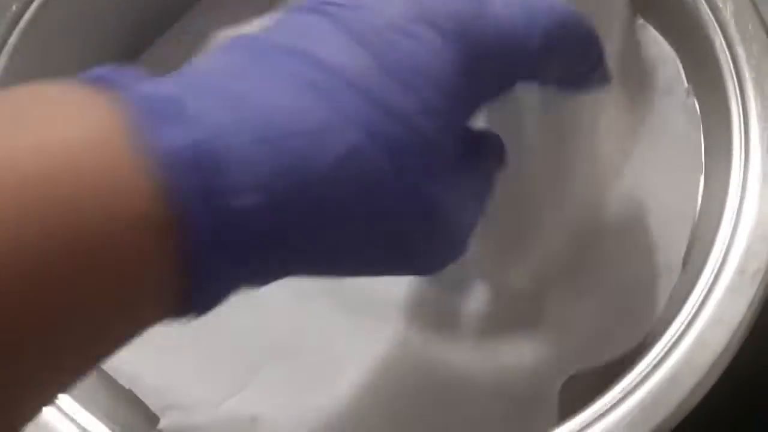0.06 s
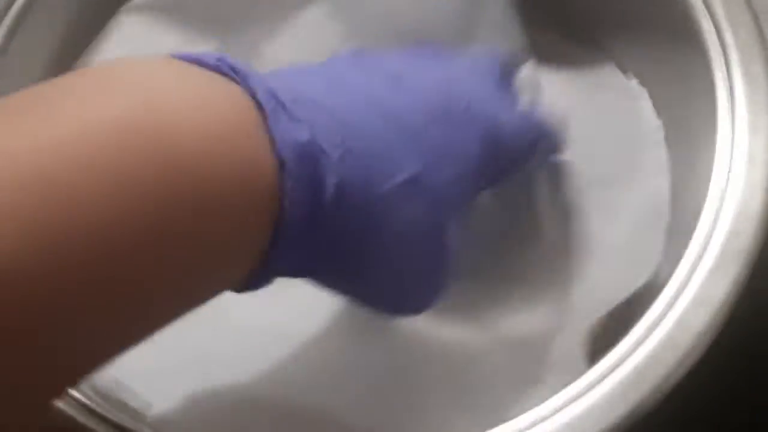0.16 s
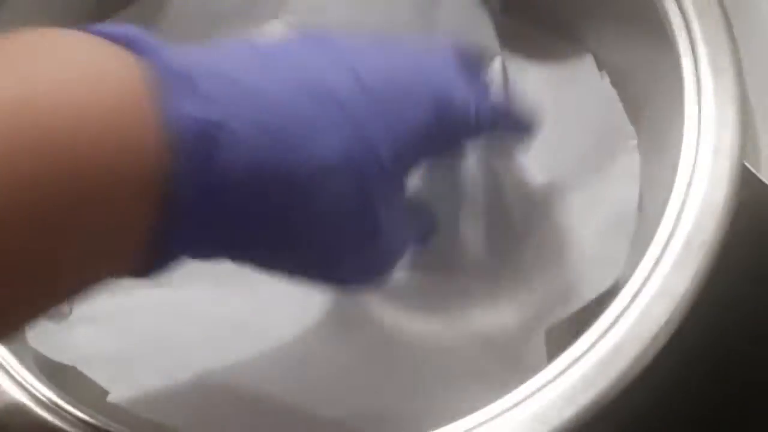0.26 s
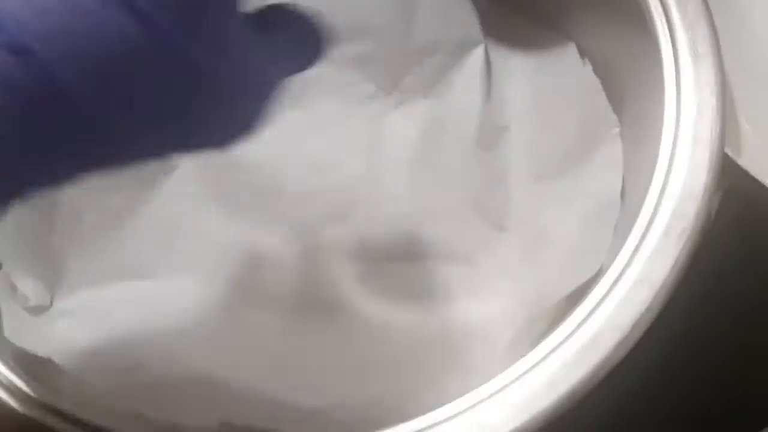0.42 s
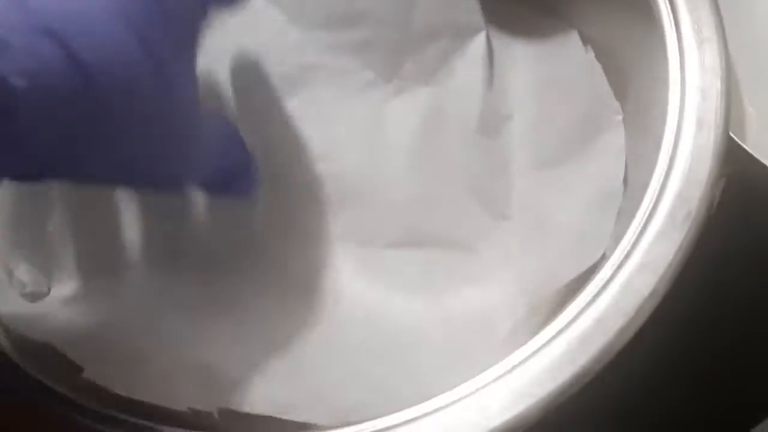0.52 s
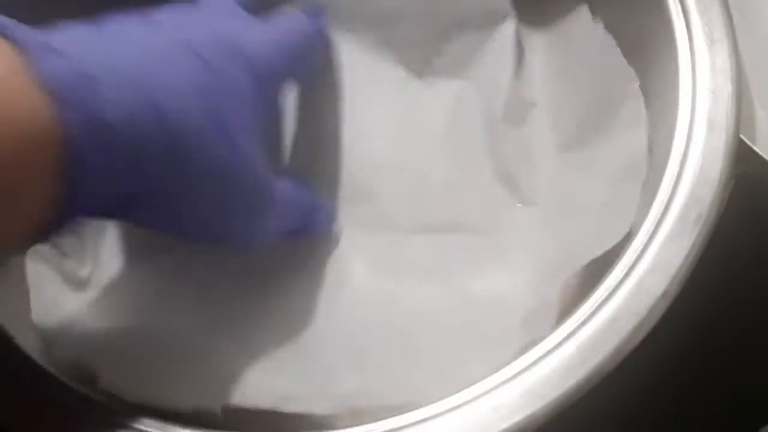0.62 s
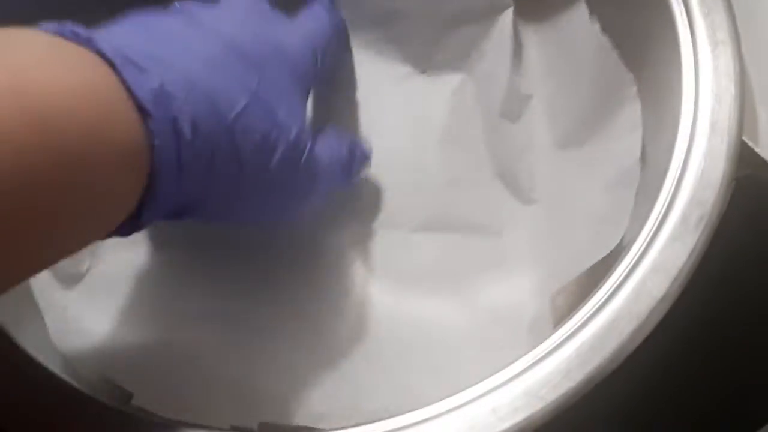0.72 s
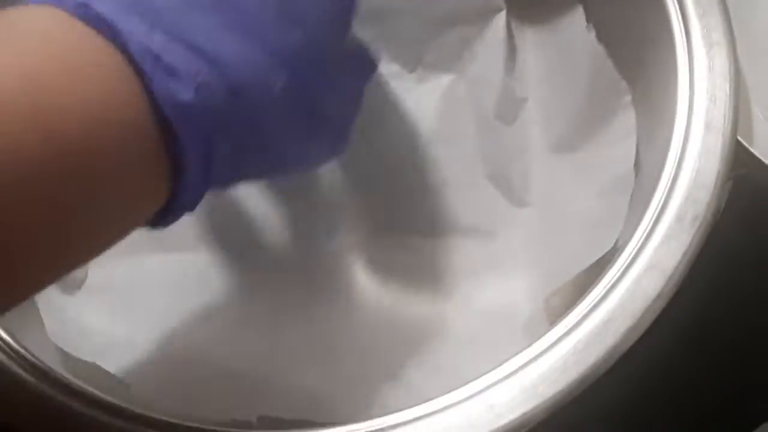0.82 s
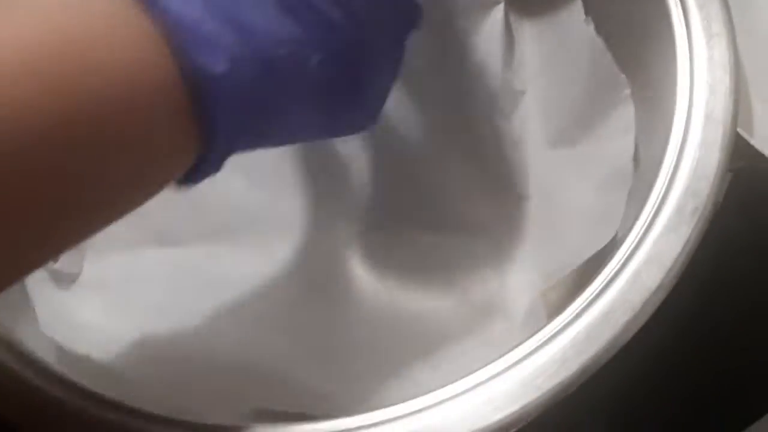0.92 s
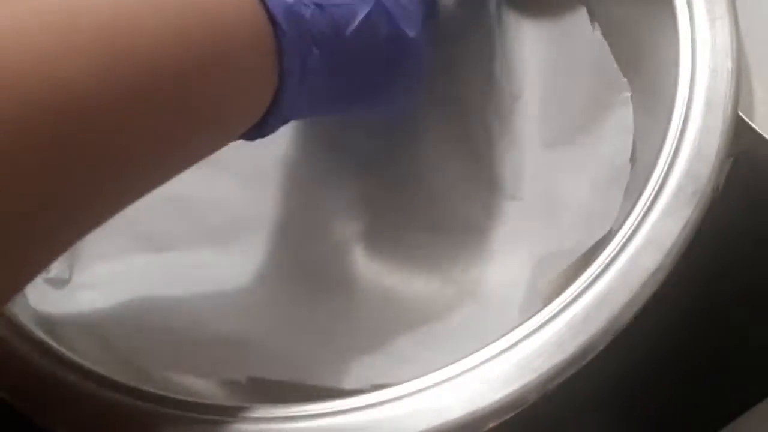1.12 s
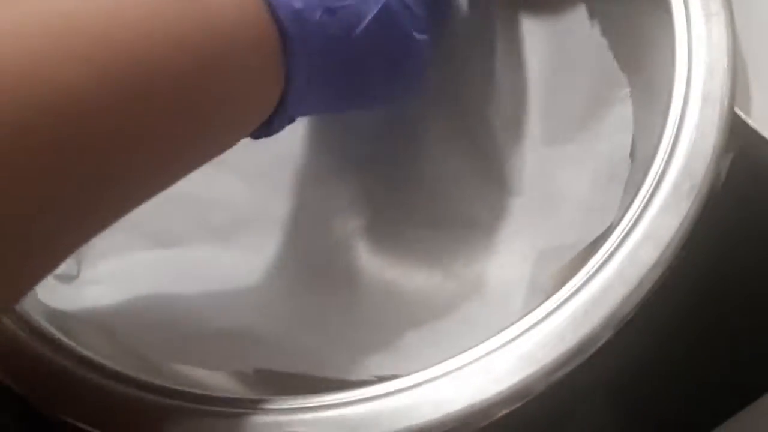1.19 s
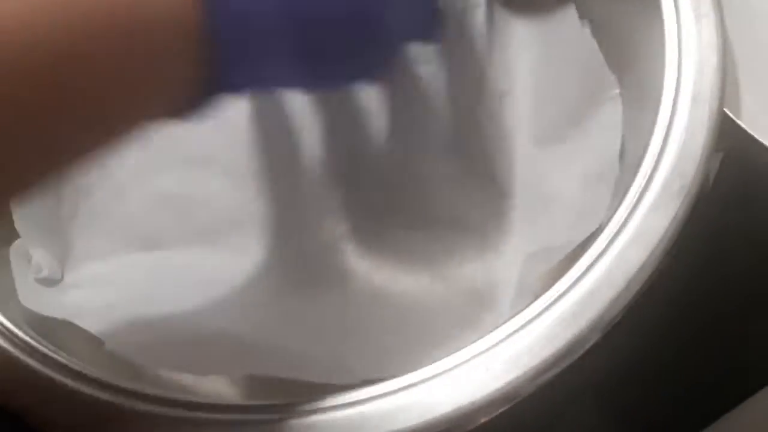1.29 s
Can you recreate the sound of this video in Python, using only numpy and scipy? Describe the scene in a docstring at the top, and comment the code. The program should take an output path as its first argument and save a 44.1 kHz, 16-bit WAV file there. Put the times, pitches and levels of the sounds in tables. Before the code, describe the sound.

Stiff baking paper crackles in three quick bursts as it is pressed into a metal pot

```python
"""A gloved hand presses baking paper into a metal pot three times, close to a pair of microphones.
The paper crackles as clumped random wavelets; creases snap as noise bursts through a resonant patch,
and the sheet pops as short damped tones. Soft knocks and a low thump come from the pushed pot.
The pot wall rings on its modes, sparse echoes fill pot and kitchen, and shaped noise is the room tone."""
import sys
import numpy as np
from scipy import signal
from scipy.fft import rfft, irfft
from scipy.io import wavfile
from scipy.ndimage import uniform_filter1d

SR = 44100
rng = np.random.default_rng(int(sys.argv[2]) if len(sys.argv) > 2 else 0)


def voltage_ratio(decibels):
    """Convert decibels (scalar or array-like) to amplitude ratios, 20 dB per decade."""
    exponent = np.asarray(decibels, float) / 20
    return 10 ** exponent


def generate_wav(signal):
    """Clip the signal to [-1, 1] and save it as 16-bit WAV at the path in sys.argv[1]."""
    frames = np.transpose(np.atleast_2d(signal))
    scaled = np.clip(frames, -1, 1) * 32767
    pcm = np.round(scaled).astype(np.int16)
    wavfile.write(sys.argv[1], SR, pcm)


N = 59535  # length [samples]

# Strength and colour of the paper's rustle, one list of rows for each press of the hand:
# (time [s], relative level [dB], treble gain [dB], thump relative to level [dB], body gain [dB])
PRESSES = [
    [(0.045, -108, 2, -30, -3), (0.051, -53, -22, -37, -2), (0.058, -37.5, -2.5, -39, 5),
     (0.127, -23, 8.5, -24, 7), (0.135, -23.5, 2, -28, 0), (0.175, -13.5, 6, -36, 0.5),
     (0.225, -29.5, 3.5, -21.5, 3), (0.233, -22, 1, -26.5, 8.5), (0.273, -49, -5.5, -10.5, 5),
     (0.535, -78, 6, -25, 3)],
    [(0.54, -87.5, 1.5, -29, -1), (0.546, -29, 1.5, -21, 5.5), (0.596, -32, 9, -40, -1),
     (0.604, -17.5, 5, -29, 1), (0.69, -26.5, 9.5, -24, -4.5), (0.714, -34, 1, -31, 1),
     (0.72, -29, 6, -34, -7.5), (0.822, -45, 1, -32, 8.5), (0.834, -38, -4, -18, -10),
     (0.852, -42, 3, -21.5, 5.5), (0.93, -57, -3, -25, 11.5)],
    [(0.935, -69, -6, -26.5, 6), (0.941, -39.5, -2, -30, 12), (0.991, -17.5, 7.5, -39.5, -1),
     (1.011, -24.5, 4, -30, -2), (1.037, -21.5, 11, -27, 2), (1.077, -38.5, 12, -13.5, -9.5),
     (1.111, -33.5, 8.5, -28, -3), (1.35, -75.5, -11, -28, 8.5)],
]
MAX_LAG_S = 0.00026  # largest delay between the two microphones
TREBLE_HZ = 5300


def evened(x):
    """Normalization: scales to unit rms."""
    return x / np.sqrt(np.mean(x ** 2) + 1e-20)


def read(points, hz):
    """Interpolation: reads a table on a log-frequency axis."""
    f, value = np.transpose(points)
    return np.interp(np.log(hz + 1), np.log(f + 1), value)


def colour(x, points):
    """Linear filtering: weights the spectrum by gains in dB."""
    gain = voltage_ratio(read(points, np.fft.rfftfreq(N, 1 / SR)))
    return irfft(rfft(x) * gain, N)


def high_pass(x, hz):
    """Second-order high-pass: attenuates what lies below its corner."""
    return signal.sosfilt(signal.butter(2, hz, "high", fs=SR, output="sos"), x)


def resonate(x, hz, width):
    """Resonance: a band of the given width [Hz] with gain 1 at its centre."""
    return signal.lfilter(*signal.iirpeak(hz, hz / width, SR), x)


def pan(db):
    """Level difference between channels: half of it up on the left, half down on the right."""
    return voltage_ratio(np.array([[.5], [-.5]]) * db)


def add(mix, s, sound):
    """Superposition: mixes a sound into both channels at a time."""
    part = mix[:, round(s * SR):][:, :sound.shape[1]]
    part += sound[:, :part.shape[1]]


def floor():
    """Partly coherent noise: quiet room tone whose left-right likeness depends on frequency."""
    # Spectrum of the room tone: (frequency [Hz], relative gain [dB])
    spectrum = [(15, -37.5), (25, 12.5), (134, -5), (217, -19), (427, -9.5), (1160, -28), (3720, -30.5),
                (4030, -39.5), (4370, -28), (16000, -39)]
    # Likeness of the two channels: (frequency [Hz], correlation [0 to 1])
    likeness = [(60, 0.88), (180, 0.13), (550, 0.54), (1650, 0), (4970, 0.57), (15000, 0.37)]
    level_db = -54.5
    a, b = rfft(rng.standard_normal((2, N)))
    same = np.clip(read(likeness, np.fft.rfftfreq(N, 1 / SR)), -1, 1)
    right = same * a + np.sqrt(1 - same ** 2) * b
    return voltage_ratio(level_db) * evened(colour(irfft([a, right], N), spectrum))


def press(column):
    """Slowly varying excitation: one control of the presses, interpolated over the whole scene."""
    rows = np.concatenate(PRESSES)
    return np.interp(np.arange(N) / SR, rows[:, 0], rows[:, column])


def pressing():
    """Onset gate: 1 from the first touch of the paper on."""
    return np.arange(N) / SR > PRESSES[0][0][0]


def crackle():
    """Random impulse train: thousands of tiny clumped buckles, each a wavelet from its own spot."""
    # Spectral weighting of the paper: (frequency [Hz], relative gain [dB])
    weighting = [(150, -50), (250, -12.5), (370, -5.5), (500, -2.5), (2160, 7.5), (2960, 9.5), (4120, 9),
                 (8260, 0.5), (14900, 2), (16000, -27)]
    rustle_db, body_hz = -5, 1300
    grains_per_s, grain_spread_db, grain_cycles = 20000, 2.4, 1.41
    clump_db, clump_s = 2, 0.0042
    clumps = evened(uniform_filter1d(rng.standard_normal(N), max(int(clump_s * SR), 2)))
    size = voltage_ratio(grain_spread_db * np.minimum(rng.exponential(1, N), 5) + clump_db * clumps)
    size *= (rng.random(N) < grains_per_s / SR) * rng.choice([-1., 1.], N)
    kind = rng.integers(0, 48, N)  # which of 48 pitches each grain has
    lag = np.round(rng.uniform(-1, 1, N) * MAX_LAG_S * SR).astype(int)
    later = np.clip(np.arange(N) + lag, 0, N - 1)  # arrival at the right microphone
    out = np.zeros((2, N))
    for k, hz in enumerate(np.geomspace(500, 16000, num=48)):
        u = np.arange(200) * hz / SR  # time in cycles
        grain = u * np.exp(-u * 2 / grain_cycles) * np.sin(2 * np.pi * u)
        grain *= np.sqrt(hz) / np.linalg.norm(grain)
        left = size * (kind == k)
        train = np.array([left, np.bincount(later, left, N)])
        out += signal.oaconvolve(train, grain[None], axes=1)[:, :N]
    out = evened(colour(out, weighting))
    treble = high_pass(out, TREBLE_HZ)
    body = signal.sosfilt(signal.butter(2, body_hz, fs=SR, output="sos"), out)
    shaded = out + (voltage_ratio(press(4)) - 1) * body + (voltage_ratio(press(2)) - 1) * treble
    return pressing() * voltage_ratio(press(1) + rustle_db) * shaded


def thump():
    """Narrow-band noise: the hand pushes the pot and its air, a low rumble that follows the press."""
    centre_hz, width_hz = 155, 140
    low = rng.standard_normal((2, N))
    for _ in range(2):
        low = resonate(low, centre_hz, width_hz)
    shared = low + low[::-1] * .4  # each channel hears some of the other
    return pressing() * voltage_ratio(press(1) + press(3)) * evened(shared)


def pot(x):
    """Modal superposition: the metal wall rings faintly as a sum of decaying sines."""
    # Modes of the pot wall: (frequency [Hz], relative level [dB], t60 [s])
    modes = [(420, -2, .4), (657, -7, .5), (996, -8, .6), (1308, -6, .6), (1507, -3, .7), (1728, -7, .7),
             (1873, -10, .6), (2148, -8, .5), (2342, -14, .6), (2740, 0, .3), (3210, -12, .5),
             (4161, -14, .4)]
    t = np.arange(N) / SR
    ring = sum(voltage_ratio(db - 60 * t / t60) * np.sin(2 * np.pi * hz * t) for hz, db, t60 in modes)
    return signal.fftconvolve(x, ring[None] / len(modes), axes=1)[:, :N]


def echoes(x, t60s, first):
    """Exponential reverberant decay: sparse random echoes per channel, each band with its own t60."""
    taps = np.zeros((2, SR))
    at = np.arange(first, SR - 40, 12)  # one echo in every 12 samples
    at = at + rng.integers(0, 12, (2, len(at)))
    np.put_along_axis(taps, at, rng.choice([-1., 1.], at.shape), 1)
    hz, t, z = signal.stft(taps, SR, nperseg=128)
    decay = voltage_ratio(-60 * t / read(t60s, hz)[:, None])
    h = signal.istft(z * decay, SR, nperseg=128)[1]
    h[:, :first] = 0  # silence before the first echo [samples]
    h /= np.linalg.norm(h, axis=1, keepdims=True)
    return signal.fftconvolve(x[None], h, axes=1)[:, :N]


def tail(x, t60s, first):
    """Varying echo paths: three spots take turns, so that like sounds do not share one colour."""
    turn = np.arange(N) / SR * 2 * np.pi * 9  # nine turns a second
    mono = x.mean(0) * np.sqrt(2 / 3)  # keeps the summed power of the three weights at 1
    return sum(echoes(mono * np.cos(turn + k * np.pi / 3), t60s, first) for k in range(3))


def snap(s, db, hz, treble_db, pan_db):
    """Impulsive excitation of a resonator: a flipping crease drives the patch of paper beside it."""
    rise_s, rattle_s = 0.00088, 0.0047  # burst peak time; decay of the rattle between the pot walls
    level_db, rattle_db = -8, -2
    patch_q, patch_width_hz, click_share = 2.6, 500, .45
    t = np.arange(2000) / SR
    draw = rng.standard_normal((3, len(t)))
    lag = round(np.clip(draw[0, 0], -1, 1) * MAX_LAG_S * SR)
    burst = np.roll(draw[0] * (t / rise_s) * np.exp(1 - t / rise_s), 14)
    burst = np.array([burst, np.roll(burst, lag)])
    burst += voltage_ratio(rattle_db) * draw[1:] * np.minimum(t / rise_s / 2, 1) * np.exp(-t / rattle_s)
    click = np.zeros_like(burst)
    click[0, 30], click[1, 30 + lag] = 1, 1
    drive = click_share * evened(click) + (1 - click_share) * evened(burst)
    patch = resonate(drive, hz, patch_width_hz + hz / patch_q)
    patch = resonate(patch, hz, 2 * hz / patch_q + patch_width_hz)
    hiss = high_pass(burst, TREBLE_HZ / 2)
    wave = evened(patch) + voltage_ratio(treble_db) * evened(hiss)
    wave[1] *= np.linalg.norm(wave[0]) / np.linalg.norm(wave[1])  # equal energy before panning
    wave *= voltage_ratio(db + level_db) * np.sqrt(rise_s * SR) / np.linalg.norm(wave) * 2
    return s, wave * pan(pan_db)


def swing(s, db, hz, pan_db, cycles):
    """Damped oscillation: a dull short tone that swells and dies within a few cycles."""
    thin_share = 0.53  # a thin wall sends out little below this share of its pitch
    u = np.arange(3000) * hz / SR  # time in cycles
    wave = u / cycles * np.exp(1 - u / cycles) * np.sin(2 * np.pi * u)
    return s, high_pass(wave, hz * thin_share) * voltage_ratio(db) * pan(pan_db)


def scene():
    """Linear superposition: paper and knocks, their echoes in pot and kitchen, and the room tone."""
    # Creases that snap: (time [s], relative level [dB], patch pitch [Hz],
    # treble relative to patch [dB], left over right [dB])
    creases = [(0.0615, -31, 4120, -3, 0), (0.111, -13.5, 3950, -2, 1.5), (0.114, -15.5, 1860, -10, 1),
               (0.1205, -9.5, 2640, 1.5, -8), (0.125, -7.5, 4750, 2, 2), (0.144, -10, 4530, -3.5, 2.5),
               (0.1576, -11, 4700, 6.5, -5), (0.1694, -1.5, 1610, 6, -3), (.1712, -8.5, 5100, -9, -4.5),
               (.1811, -7, 5000, 17, -1), (.1880, -9.5, 5600, -8, 15.5), (.2060, -19.5, 4730, 14.5, 1.5),
               (0.2292, -15.5, 4300, 25, -4), (0.2373, -13, 6600, 0, -4), (0.5479, -16.5, 4860, -1.5, -4),
               (0.603, -9, 3560, 4, 11), (0.6079, -8.5, 8200, -3.5, -1), (0.624, -8, 3540, 10, 3),
               (0.6396, -4.5, 4100, 2, -0.5), (0.6452, -16, 3200, 2.5, -9), (0.66, -11.5, 3700, -13, -3),
               (0.676, -16, 4500, 4.5, 7), (0.7197, -11.5, 3530, 3.5, -0.5), (0.7466, -16.5, 4540, 34.5, 1),
               (0.7797, -24.5, 4470, 4, 1), (0.7921, -23.5, 4100, 0.5, 3), (0.8327, -6, 3660, 0, -5),
               (0.9797, -4.5, 5100, 10, -2), (0.9915, -13, 4800, -25, 2), (1.026, -5.5, 4170, 17.5, -8),
               (1.033, -7.5, 6500, 20, 15), (1.0425, -5, 5900, 4, -7), (1.0607, -14, 5400, 6.5, 1),
               (1.1595, -23.5, 3400, -4, -1.5), (1.2058, -32, 2440, -2, -0.5)]
    # The sheet pops in or out as a whole, one broad swing:
    # (time [s], relative level [dB], pitch [Hz], left over right [dB])
    pops = [(0.0739, -24, 1910, -4.5), (0.5469, -26, 1497, -10), (0.6043, -10, 2090, 0),
            (0.832, -36.5, 1510, -4), (0.943, -29, 1260, 2), (.9924, -13, 4940, -1),
            (1.027, -26.5, 900, -1), (1.2799, -50, 593, -2)]
    # Soft knocks on the pot wall: (time [s], relative level [dB], pitch [Hz], drive of the ring [dB])
    wall_knocks = [(0.318, -51, 464, -35.5), (0.37, -61, 411, -46.5), (.428, -57, 440, -59.5),
                   (0.849, -48, 446, -47.5), (1.107, -49.5, 776, -54), (1.171, -59, 399, -70.5),
                   (1.222, -60, 457, -64)]
    # Decay of the echoes inside the pot: (frequency [Hz], t60 [s])
    bowl = [(300, 0.013), (2000, 0.056), (12000, 0.021)]
    # Decay of the kitchen's echoes: (frequency [Hz], t60 [s])
    kitchen = [(250, 0.98), (1000, 1), (2500, 0.6), (5000, 0.32), (9000, 0.36), (16000, 0.26)]
    left_db = -3.5  # rustle and knocks, left over right
    bowl_db, kitchen_db, pot_db = -3, -17.5, -59
    ring_lag_s = .014  # the ring comes up a moment after the knock

    rustle = crackle() * pan(left_db)
    snaps, knocks, blows = np.zeros((3, 2, N))
    for row in creases:
        add(snaps, *snap(*row))
    for s, db, hz, ring_db in wall_knocks:
        add(knocks, *swing(s, db, hz, left_db, cycles=2.5))
        add(blows, s + ring_lag_s, voltage_ratio(ring_db) * np.ones((2, 1)))
    for row in pops:
        add(knocks, *swing(*row, cycles=0.42))
    paper = rustle + snaps + knocks
    near = paper + voltage_ratio(bowl_db) * tail(rustle + knocks, bowl, first=40)  # snaps have their own rattle
    metal = pot(voltage_ratio(pot_db) * paper + blows)
    far = voltage_ratio(kitchen_db) * tail(paper, kitchen, first=300)
    return near + metal + far + thump() + floor()


def low_pass(x):
    """Removes everything above the highest recorded frequency."""
    return signal.sosfilt(signal.butter(12, 16970, fs=SR, output="sos"), x)


def record(dry):
    """Coincidence at long wavelengths: close microphones narrow the bass; low cut and band limit."""
    close_hz, close_db = 900, -0.5  # the left-right difference is slightly weaker below this
    low_cut_hz, edge_hz = 213, 16050
    mid, side = (dry[0] + dry[1]) / 2, (dry[0] - dry[1]) / 2
    side = colour(side, [(close_hz / 2, close_db), (close_hz * 2, 0)])
    cut = high_pass([mid + side, mid - side], low_cut_hz)
    edge = signal.firwin(511, edge_hz, window=("kaiser", 9), fs=SR)
    mix = signal.oaconvolve(cut, edge[None], "same")
    return low_pass(mix)


dry = scene()
out = record(dry)
generate_wav(out)
```